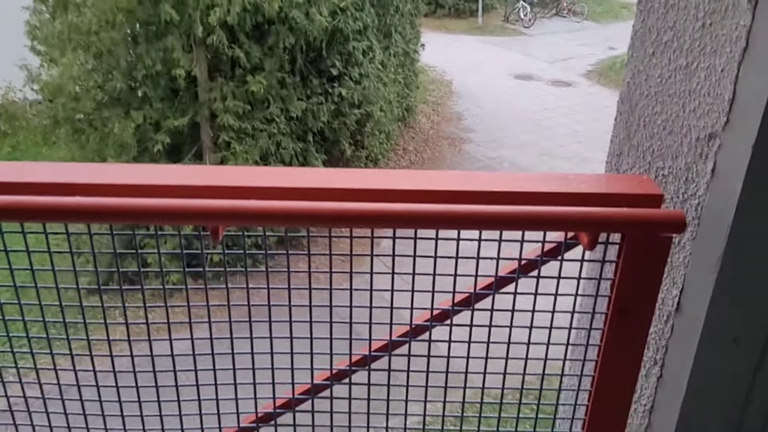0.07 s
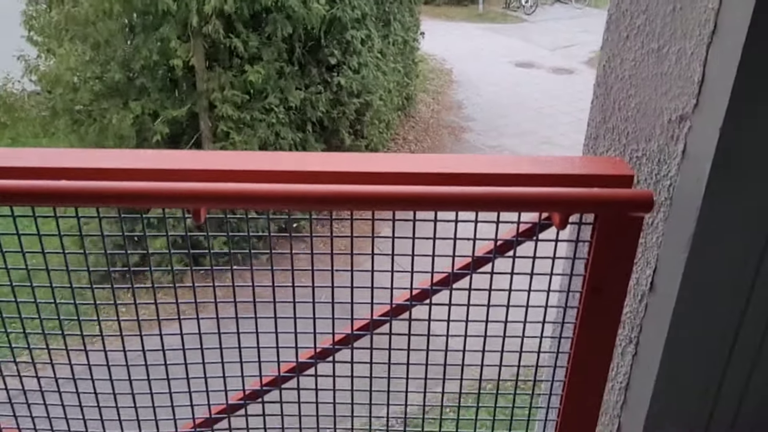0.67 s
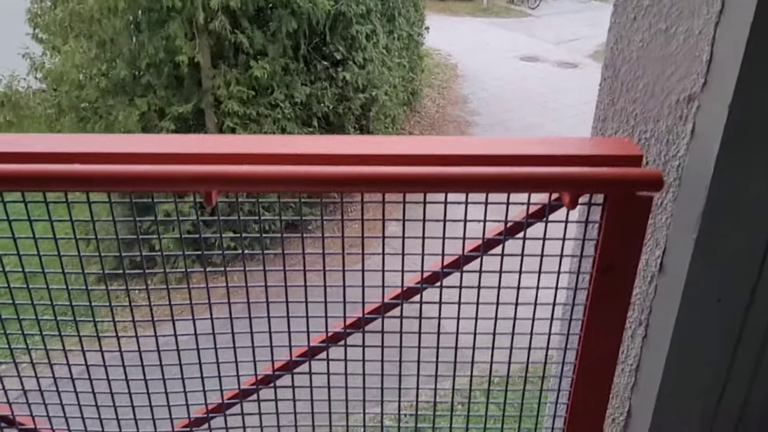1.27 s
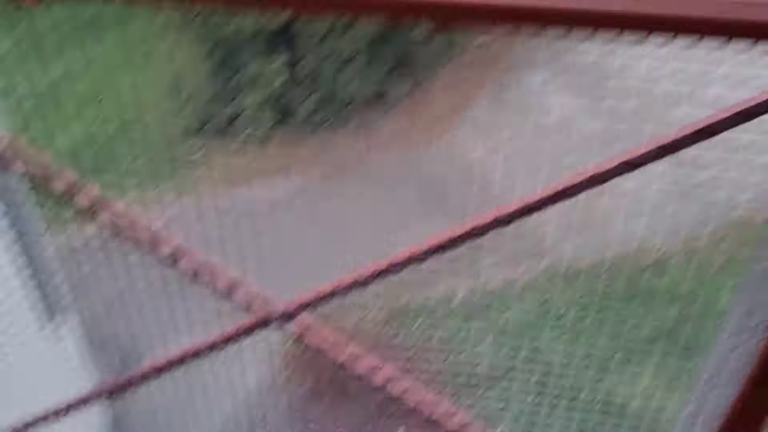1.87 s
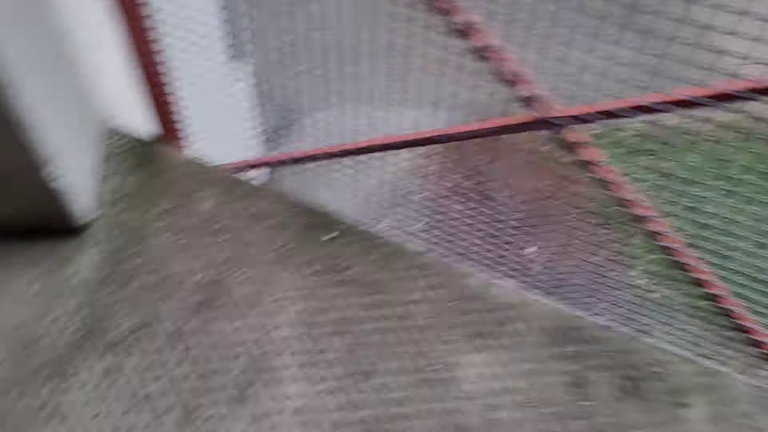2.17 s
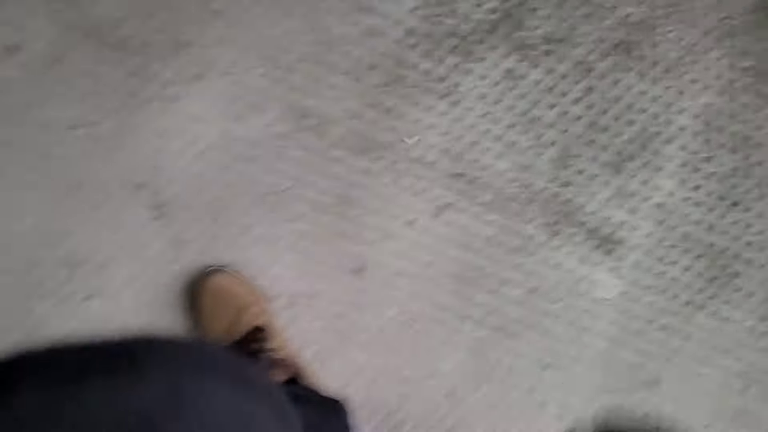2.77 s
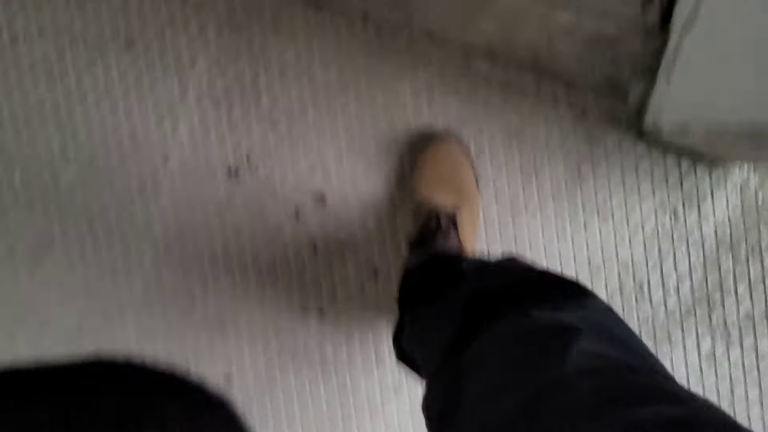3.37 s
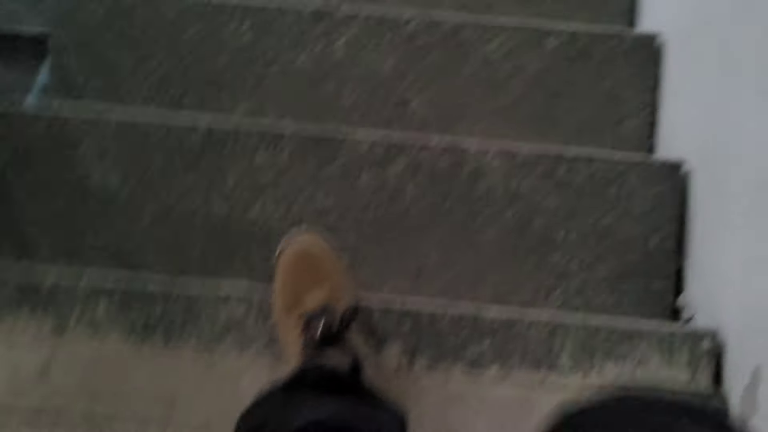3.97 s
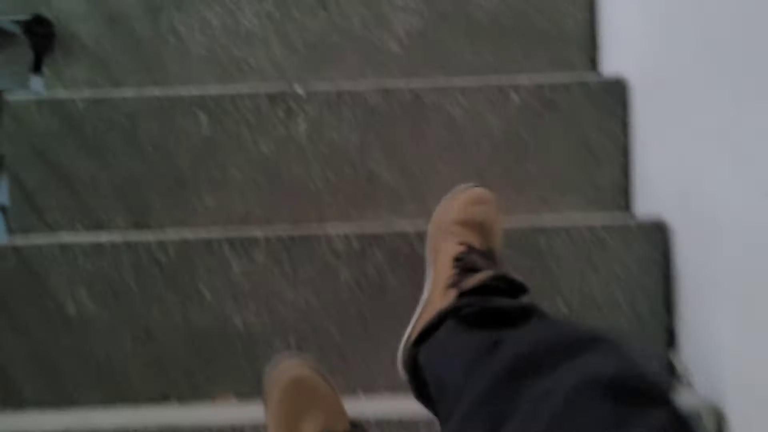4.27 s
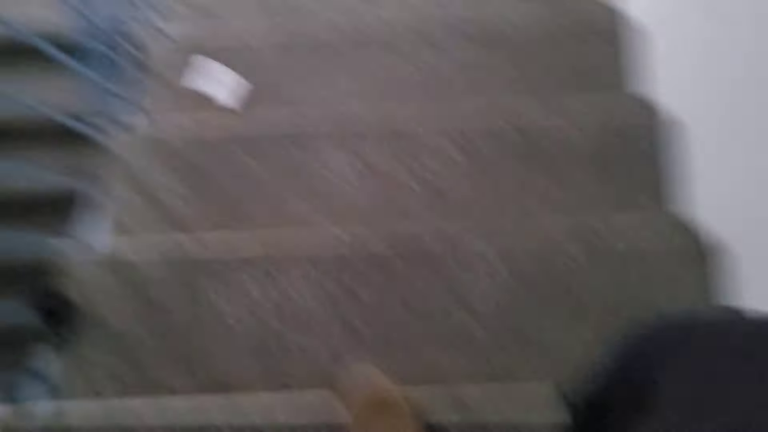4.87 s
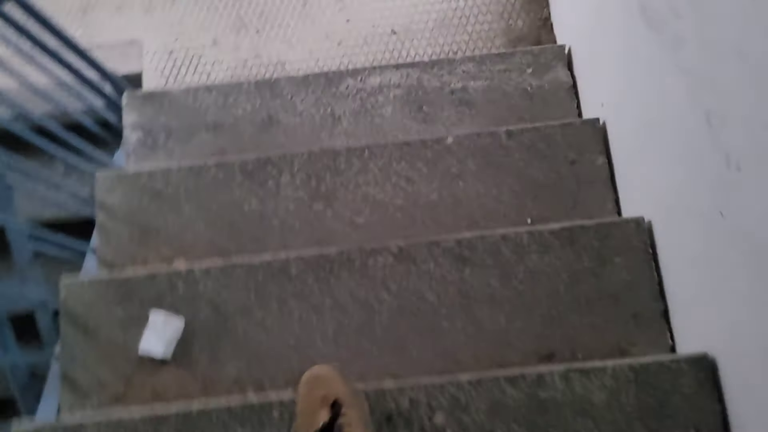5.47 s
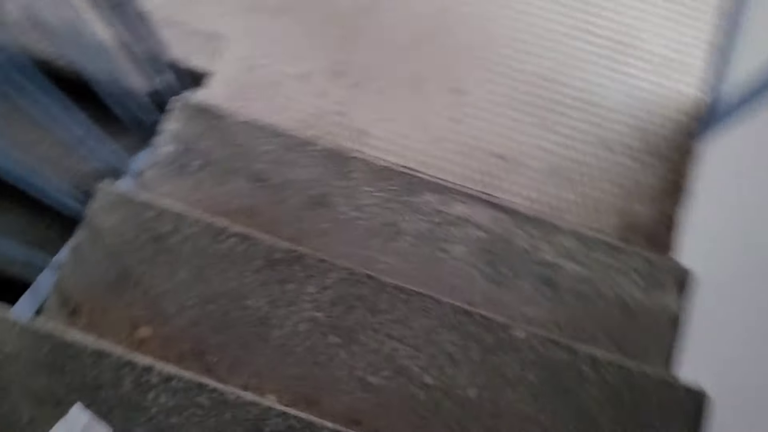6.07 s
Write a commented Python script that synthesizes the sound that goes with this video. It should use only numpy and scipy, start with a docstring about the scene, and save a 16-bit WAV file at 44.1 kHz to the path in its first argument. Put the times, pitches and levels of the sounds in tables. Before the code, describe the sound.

Someone in boots walks across a concrete landing and down an echoing stairwell, heard from a microphone in their hand. First come small handling clicks and sleeve swishes, mostly on the left, against a quiet outdoor background. Soles then scuff, grit ticks and a few light steps follow. Finally, brisk, deep footfalls descend the stairs in a steady rhythm, each ringing briefly off the bare walls while clothing keeps rustling.

```python
"""Boots turn on a concrete landing, cross it and walk down a flight of stairs.
Each impact thumps, excites the modes of the stair slab and booms in the reverberant stairwell.
Friction makes the soles judder and scrape on grit, and the clothes swish close to the microphone.
Fingers knock the hand-held camera and air buffets it, over a faint hush from outdoors."""
import sys
import numpy as np
from scipy import signal
from scipy.fft import rfft, irfft, next_fast_len
from scipy.io import wavfile

SR = 44100
rng = np.random.default_rng(int(sys.argv[2]) if len(sys.argv) > 2 else 0)


def master(y):
    """Save y as 16-bit WAV."""
    cut = np.clip(np.atleast_2d(y).T, -1, 1)
    pcm = np.round(cut * 32767)  # scale
    wavfile.write(sys.argv[1], SR, pcm.astype(np.int16))


N = 273464
TIME = np.arange(N) / SR


def amp(db):
    return 10 ** (np.asarray(db) / 20)


def read(points, hz):
    """Interpolation of a spectrum on a log-frequency axis."""
    f, value = np.transpose(points)
    return np.interp(np.log(hz + 1), np.log(f + 1), value)


def follow(rows, column=1):
    """Linear interpolation of a curve at every sample."""
    rows = np.asarray(rows)
    return np.interp(TIME, rows[:, 0], rows[:, column])


def fade(t, t60):
    """Exponential decay: 60 dB in t60 seconds."""
    return np.exp(-np.log(1000) * t / t60)


def ring(t, hz, t60):
    """Free vibration of one damped mode."""
    return np.sin(2 * np.pi * hz * t) * fade(t, t60)


def panned(db):
    """Constant-power panning: the left is db louder than the right."""
    gains = amp(np.array([db, -db]).reshape(2, -1) / 2)
    return gains / np.sqrt((gains ** 2).mean(0))


def add(mix, start_s, sound):
    """Superposition of a sound on the mix."""
    part = mix[:, max(round(start_s * SR), 0):][:, :sound.shape[-1]]
    part += sound[..., :part.shape[1]]


def together(levels):
    """Incoherent sources add in power."""
    return np.sqrt(sum(level ** 2 for level in levels))


def stroke(peak_s, db, rise_s, fall_s, rounding=0.011):
    """The envelope of one movement swells, rounds off and dies away."""
    t = TIME - peak_s
    away = np.minimum(np.where(t < 0, -t / rise_s, t / fall_s), 20)
    return amp(db) / np.cosh(away) * np.exp(-rounding * away ** 2)


def flutter(per_s, depth):
    """Random amplitude modulation of unit rms; depth scales a swing of about 2.3 dB each way."""
    swing_db = np.interp(TIME * per_s, np.arange(N), rng.uniform(-2.4, 2.2, N))
    gain = amp(depth * swing_db)
    return gain / np.sqrt(np.mean(gain ** 2) + 1e-20)


# likeness of the two microphone ports: frequency_hz, correlation (clipped to 1)
PORT_CORRELATION = [(30, 4), (70, 0.34), (150, 1), (300, 0.83), (600, 0.52), (1100, -0.12), (3000, 0),
                    (16000, 0)]
# their imbalance: frequency_hz, pan_db
PORT_BALANCE = [(200, 0.5), (600, 1), (1200, -0.5), (2200, -4), (4200, -0.5), (6000, -7.5), (8000, 1),
                (12000, 2.5), (16000, -0.5)]

def noise(spectrum, size=N):
    """Partly coherent noise: the ports agree in the bass, not the treble; their mean has rms 1."""
    length = next_fast_len(size)
    hz = np.fft.rfftfreq(length, 1 / SR)
    left, independent = rfft(rng.standard_normal((2, length)))
    same = np.clip(read(PORT_CORRELATION, hz), -1, 1)
    right = same * left + np.sqrt(1 - same ** 2) * independent
    shaped = np.array([left, right]) * amp(read(spectrum, hz)) * panned(read(PORT_BALANCE, hz))
    x = irfft(shaped, length)[:, :size]
    return x / x.mean(0).std()


# spectrum of the outdoor hush: frequency_hz, density_db
HUSH_SPECTRUM = [(30, -15), (90, -10.5), (165, -1.5), (220, -3), (285, 0.5), (420, -11), (520, -10.5),
                 (590, -8), (690, -11.5), (870, -12), (1300, -19.5), (2500, -35), (7000, -36.5),
                 (16000, -53)]

def outdoors(hush_db=-45.5, hum_db=-60, hum_hz=588.2, skirt_hz=24):
    """Broadband noise makes a steady hush; narrowband noise wavers as a distant hum."""
    band = [(hum_hz / 2, -100), (hum_hz - skirt_hz, -25), (hum_hz, 0),
            (hum_hz + skirt_hz, -25), (2 * hum_hz, -100)]
    return noise(HUSH_SPECTRUM) * amp(hush_db) + noise(band) * amp(hum_db)


# spectrum of a deep rumble: frequency_hz, density_db
RUMBLE_SPECTRUM = [(20, -40), (34, 1), (42, 1), (55, -15), (76, -7), (110, -28), (300, -70)]

def rumble(start_s=5.15, rise_s=0.12, level_db=-42, pan_db=-4):
    """Low-frequency noise swells late in the descent and then holds."""
    swell = np.clip((TIME - start_s) / rise_s, 0, 1)
    return noise(RUMBLE_SPECTRUM) * swell * amp(level_db) * panned(pan_db)


# how briskly the walker moves: time_s, effort_db
WALKING_EFFORT = [(0, -44), (.45, -10), (.85, -18), (1.0, -5), (1.7, -5.5), (1.95, 1.5), (3.15, -1.5),
                  (3.45, 7), (4.22, -2.5), (4.5, 4.5), (6.2, 4)]

def motion(level_db, exponent=1):
    """A power law ties a continuous sound to the walker's effort; level_db holds at 0 dB effort."""
    return amp(level_db + exponent * follow(WALKING_EFFORT))


# spectrum of air on the microphone: frequency_hz, density_db
WIND_SPECTRUM = [(15, 1.5), (25, -27), (36, -7.5), (60, -3), (100, -1.5), (200, -21), (600, -71)]
# puffs as the camera swings: peak_s, level_db
AIR_PUFFS = [(0.01, -50), (.22, -53), (.55, -58), (.73, -55), (1.59, -47), (1.97, -45), (2.63, -36.5),
             (2.81, -52), (3.12, -48.5), (3.56, -44), (3.81, -38.5), (4.22, -40.5), (5.28, -35),
             (6.09, -39)]

def buffeting(gain_db=6.5, pan_db=-7):
    """Turbulence at the moving microphone makes slow pressure fluctuations."""
    puffs = together(stroke(s, db, rise_s=0.021, fall_s=0.045) for s, db in AIR_PUFFS)
    strength = together([puffs, motion(-58.5, exponent=1.8)])
    return noise(WIND_SPECTRUM) * strength * amp(gain_db) * panned(pan_db)


# course of a thin squeak: time_s, pitch_hz, level_db
SQUEAK_GLIDE = [(5.795, 14400, -70), (5.805, 14400, -47), (5.82, 13700, -56), (5.84, 14700, -63),
                (5.86, 14800, -86), (5.88, 14400, -60), (5.90, 12800, -62), (5.915, 11300, -85)]

def squeak():
    """Frequency modulation of a faint, high tone gives a gliding whistle."""
    phase = 2 * np.pi * np.cumsum(follow(SQUEAK_GLIDE)) / SR
    tone = np.sin(phase) * amp(follow(SQUEAK_GLIDE, column=2))
    sounding = (TIME > SQUEAK_GLIDE[0][0]) & (TIME < SQUEAK_GLIDE[-1][0])
    return tone * sounding * flutter(per_s=320, depth=-1.0)


# spectra of smooth jacket fabric and of coarser cloth: frequency_hz, density_db
JACKET_SPECTRUM = [(300, -0.5), (1000, -11), (2500, -10), (4200, -5), (5600, 2), (7000, 4.5), (8400, -6),
                   (9600, -2.5), (11700, 5.5), (13500, 4), (16000, -4)]
CLOTH_SPECTRUM = [(300, 6), (1000, -4.5), (2500, 0), (4200, -0.5), (6000, 0.5), (7400, 2), (8700, -5.5),
                  (10000, -4), (12000, -2.5), (14000, -7), (16000, -4)]

def fabric(smooth, coarse):
    """Friction noise: fibres catch and slip in a grainy blend of two fabrics."""
    blend = smooth * noise(JACKET_SPECTRUM) + coarse * noise(CLOTH_SPECTRUM)
    return blend * flutter(per_s=63, depth=1.12)


def creases(per_s=30, loudest_db=-57, spread_db=10, t60=0.011, rustle_db=-72, pan_db=-30):
    """Buckling: small creases snap at random in the sleeve's faint rustle."""
    snaps, t = np.zeros((1, N)), np.arange(SR // 16) / SR
    for when, size in rng.random((int(per_s * N / SR), 2)):
        add(snaps, when * N / SR, amp(loudest_db - spread_db * size) * fade(t, t60))
    return noise(JACKET_SPECTRUM) * (snaps[0] + amp(rustle_db)) * panned(pan_db)


# spectrum of the dull rub of clothing: frequency_hz, density_db
RUB_SPECTRUM = [(40, -10), (100, -7.5), (160, -4.5), (290, -2.5), (450, -8), (700, -13.5), (1200, -34),
                (3000, -38)]
# strokes of the jacket sleeve: peak_s, level_db, rise_s, fall_s, pan_db, smooth_share
SLEEVE_STROKES = [(0.0, -50, .02, 0.015, -41, 0.4), (.22, -51.5, 0.079, 0.063, -35, 0.35),
                  (.5, -48.5, 0.0089, 0.025, -27, 0.1), (.587, -43, 0.024, 0.034, -22, 0.92),
                  (1.07, -53.5, .012, 0.031, -12, 0), (1.53, -39.5, 0.03, 0.043, -19, 0.5),
                  (1.78, -47.5, 0.083, 0.094, -17, 1), (2.08, -40.5, 0.14, 0.087, -6.5, 1),
                  (2.33, -52.5, 0.1, 0.35, -20, 0.9), (2.492, -40.5, 0.012, 0.071, -5, 0.93),
                  (2.575, -40, 0.062, 0.065, -20, 0.4), (2.85, -47.5, 0.05, 0.073, -23, 1),
                  (2.99, -49, 0.026, 0.048, -10, 1), (3.33, -50, 0.094, 0.15, -2, .7),
                  (3.555, -41, 0.04, 0.052, -15, 0.54), (3.66, -41.5, 0.043, 0.034, -15, 0.7),
                  (3.78, -41.5, 0.037, 0.034, -8, 0.4), (3.89, -45, 0.029, 0.12, -2, 0.24)]

def clothes(sleeve_gain_db=0.5, seam_gain_db=-8, legs_gain_db=3.1, legs_smooth_share=0.056):
    """Sliding friction: sleeve and trousers swish and seams rasp, above a dull rub."""
    arms = [(stroke(s, db, rise_s, fall_s) * panned(pan_db), share)
            for s, db, rise_s, fall_s, pan_db, share in SLEEVE_STROKES]
    swish, _ = strides()
    legs = together([swish, motion(-54)])
    moves = [(amp(sleeve_gain_db) * level, share) for level, share in arms]
    moves.append((amp(legs_gain_db) * legs, legs_smooth_share))
    smooth = together(level * np.sqrt(share) for level, share in moves)
    coarse = together(level * np.sqrt(1 - share) for level, share in moves)
    sleeve = together(level for level, _ in arms)
    seams = sleeve * amp(seam_gain_db) * noise(SCRAPE_SPECTRUM)
    rub = together([sleeve, motion(-47, exponent=0.7) * panned(-7)])
    return fabric(smooth, coarse) + seams + rub * noise(RUB_SPECTRUM) * flutter(per_s=60, depth=2.5)


# spectrum of a click on the case: frequency_hz, density_db
CLICK_SPECTRUM = [(200, 14.5), (700, 7), (2000, -1), (4000, -11), (7000, -4), (9000, -28), (12000, -1),
                  (16000, -13)]
# fingers on the camera: start_s, level_db, knock_t60_s, click_gain_db, wobble_gain_db, brush_gain_db
FINGER_KNOCKS = [(0.1117, -25.5, 0.055, -2.5, -22, -25), (0.19, -22, 0.022, -2, -19, -23),
                 (0.4885, -21, 0.037, -8, -19, -33), (2.9425, -26, 0.012, 1, -13.5, -36),
                 (2.9515, -19, 0.016, -6, -35, -41), (3.5082, -14.5, 0.015, -8, -24, -42),
                 (4.1159, -19.5, 0.025, -17.5, -7, -25), (4.189, -19, 0.015, -15, -14, -23),
                 (4.235, -25.5, 0.013, -18, -7, -16.5)]

def finger_knocks(knock_hz=260, wobble_hz=61, click_t60=0.0081, brush_s=0.0056, pan_db=-25):
    """Structure-borne sound: the case clicks, knocks and wobbles as cloth brushes the right port."""
    out, t = np.zeros((2, N)), np.arange(SR // 2) / SR
    wobble = ring(t, wobble_hz, t60=0.24) * panned(-7)
    brush_envelope = t / brush_s * np.exp(1 - t / brush_s)
    for s, db, t60, click_db, wobble_db, brush_db in FINGER_KNOCKS:
        click = amp(click_db) * fade(t, click_t60) * noise(CLICK_SPECTRUM, len(t))
        brush = amp(brush_db) * brush_envelope * noise(CLOTH_SPECTRUM, len(t))
        near = (ring(t, knock_hz, t60) + click + brush) * panned(pan_db)
        add(out, s, amp(db) * (near + amp(wobble_db) * wobble))
    return out


# slips of cloth and leather: start_s, level_db, centre_hz, half_width_octaves, t60_s, pan_db
SLIPS = [(.156, -31, 4000, 1.5, 0.0093, -26), (0.2517, -31.5, 4400, 7.9, 0.045, -34),
         (0.257, -33.5, 3260, 0.76, 0.053, -33), (.729, -47, 5000, 1.2, .027, -10),
         (2.305, -39, 2360, 0.46, 0.034, 3), (2.471, -36, 1990, 1.3, 0.062, -2),
         (3.365, -37, 1520, 0.14, 0.073, -1), (3.646, -36, 1950, 0.24, 0.19, -9),
         (3.764, -36.5, 2300, 0.19, 0.08, -11), (3.869, -39, 2150, 0.35, 0.19, -8),
         (3.957, -37, 1370, 0.4, 0.092, 6), (5.119, -36, 4500, .7, .2, -1),
         (5.136, -37.5, 3300, 0.86, 0.23, -3), (5.936, -22, 14500, 0.36, 0.018, 8),
         (5.946, -35, 13800, 0.35, 0.12, 2), (6.076, -42, 3400, 0.69, 0.51, -3)]

def rasps(rise_s=0.0021):
    """Static friction gives way: each slip is a burst of noise in its own band."""
    out, t = np.zeros((2, N)), np.arange(SR // 4) / SR
    grid_hz = np.geomspace(50, 20000, 200)
    for s, db, hz, octaves, t60, pan_db in SLIPS:
        band_db = -20 * np.log10(1 + (np.log2(grid_hz / hz) / octaves) ** 2)
        burst = noise(np.c_[grid_hz, band_db], len(t)) * fade(t, t60) * (1 - np.exp(-t / rise_s))
        add(out, s, amp(db) * burst * flutter(per_s=360, depth=0.5)[:len(t)] * panned(pan_db))
    return out


# reverberation time of the stairwell: frequency_hz, t60_s
STAIRWELL_T60 = [(60, 0.84), (170, 0.86), (330, 1), (700, 0.34), (2000, 0.2), (8000, 0.34)]

def absorb(x):
    """Absorption: between the concrete walls each band decays at its own rate."""
    hz, t, bands = signal.stft(x, SR, nperseg=512)
    decayed = bands * fade(t, read(STAIRWELL_T60, hz)[:, None])
    return signal.istft(decayed, SR, nperseg=512)[1][:, :x.shape[1]]


def stairwell(x, delay_s=0.006):
    """Reverberation: convolution with the dense reflections from bare walls."""
    tail = absorb(rng.standard_normal((2, SR)) * (np.arange(SR) > delay_s * SR))
    return signal.fftconvolve(x, tail / np.linalg.norm(tail[0]), axes=1)[:, :N]


# ticks of grit and lace ends: start_s, level_db, pitch_hz, t60_s, fizz_gain_db, pan_db
SMALL_IMPACTS = [(2.1196, -14, 1230, 0.0042, -29, -7), (2.161, -28, 1100, 0.0039, -1, -8),
                 (2.3039, -17, 2060, 0.0025, -38, -21), (3.365, -24, 13000, 0.0026, 1, 2),
                 (3.6136, -16.5, 750, 0.0087, -32, 3), (3.8585, -24, 696, 0.017, -14, 2),
                 (3.873, -28, 2000, 0.01, -2, -14), (3.9138, -21, 613, 0.02, -38, 2),
                 (4.472, -26, 1240, 0.012, -21, -6), (4.7545, -20, 670, 0.0097, -20, 7),
                 (4.857, -27, 1280, 0.017, -25, 7), (5.151, -17.5, 700, 0.0047, -11, 3),
                 (5.68, -29, 636, 0.023, -17, 8), (5.973, -27.5, 576, .02, -24, 6)]

def ticks():
    """Small, hard impacts each excite a heavily damped mode and a fizz of noise."""
    out, t = np.zeros((2, N)), np.arange(SR // 16) / SR
    for s, db, hz, t60, fizz_db, pan_db in SMALL_IMPACTS:
        fizz = amp(fizz_db) * noise(CLOTH_SPECTRUM, len(t)) * fade(t, t60)
        add(out, s, amp(db) * (fizz - ring(t, hz, t60)) * panned(pan_db))
    return out


# spectrum of rough scraping: frequency_hz, density_db
SCRAPE_SPECTRUM = [(200, -12), (500, -1.5), (900, 2), (1400, 1), (2100, 1.5), (3000, -3.5), (4200, -3),
                   (7000, -16), (9000, -21), (16000, -52)]
# scuffs on the landing: peak_s, level_db, rise_s, fall_s
LANDING_SCUFFS = [(1.97, -47, 0.032, 0.078), (2.14, -44.5, 0.062, 0.028), (2.55, -41.5, 0.046, 0.12),
                  (2.85, -42.5, 0.027, 0.021), (3.29, -48, 0.033, 0.072), (3.63, -42.5, 0.049, 0.066),
                  (3.77, -44.5, 0.018, 0.049), (3.88, -43, 0.023, 0.075)]

def sole_scrapes(grains_per_s=70, grain_gain_db=11, grain_t60=0.0085):
    """Roughness noise: rubber drags over concrete, and single grains of grit crack under it."""
    drag = noise(SCRAPE_SPECTRUM) * flutter(per_s=60, depth=1.5)
    t = np.arange(1024) / SR
    for when, pitch, left, right in rng.random((int(grains_per_s * N / SR), 4)):
        crack = ring(t, hz=550 * 6.5 ** pitch, t60=grain_t60)
        add(drag, when * N / SR, amp(grain_gain_db) * np.outer([left, right], crack))
    landing = together(stroke(*row) for row in LANDING_SCUFFS)
    _, flight = strides()
    return drag * together([landing * panned(-3), flight * panned(3), motion(-53) * panned(-3)])


# hollow tones of a sole on the landing: pitch_hz, level_db
JUDDER_TONES = [(319, 0.5), (350, -4.5), (556, -8), (574, -7.5), (657, -14)]

def sole_judder(start_s=2.469, gain_db=-27.5, rise_s=0.0029, hold_s=0.042, t60=0.48, pan_db=1):
    """Stick-slip vibration of a turning sole: close pairs of tones beat against each other."""
    t = np.maximum(TIME - start_s, 0)
    tones = sum((-1) ** k * amp(db) * np.sin(2 * np.pi * hz * t)
                for k, (hz, db) in enumerate(JUDDER_TONES))
    level = amp(gain_db) * (1 - np.exp(-t / rise_s)) * fade(np.maximum(t - hold_s, 0), t60)
    return tones * level * flutter(per_s=82, depth=-1.5) * panned(pan_db)


# steps down the flight, toe first: toe_s, toe_db, toe_hz, slab_gain_db, boom_cutoff_hz, toe_swish_db,
# heel_s, heel_db, heel_hz, heel_swish_db
STAIR_STEPS = [(4.392, -18.5, 133.5, -3, 310, -44, 4.502, -24, 143, -45.5),
               (4.754, -13, 179, -2, 490, -44.5, 4.856, -23, 294, -52),
               (5.161, -14.5, 190, 0.5, 326, -37.5, 5.289, -23.5, 187, -44.5),
               (5.583, -17.5, 127, -10, 403, -41, 5.679, -22.5, 341, -48.5),
               (6.0, -16.5, 134, -19, 535, -47, 6.114, -27, 150, -42)]

def strides(toe_lead_s=0.0017, heel_lead_s=0.018, toe_drag_gain_db=-9.5, heel_drag_db=-41.5):
    """Friction envelopes: trousers swish as the toe lands and the knee gives; the heel drags most."""
    swish, drag = [], []
    for toe_s, _, _, _, _, toe_swish_db, heel_s, _, _, heel_swish_db in STAIR_STEPS:
        toe = stroke(toe_s - toe_lead_s, toe_swish_db, rise_s=0.038, fall_s=0.039)
        heel = stroke(heel_s - heel_lead_s, 0, rise_s=0.056, fall_s=0.074)
        swish += [toe, heel * amp(heel_swish_db)]
        drag += [toe * amp(toe_drag_gain_db), heel * amp(heel_drag_db)]
    return together(swish), together(drag)


# modes of the stair slab: pitch_hz, level_db, t60_s
SLAB_MODES = [(108.3, -11.5, 0.4), (169.7, 1, 0.46), (221.6, -5.5, 0.29), (247.7, -17, 0.95),
              (327, -8.5, 0.46), (375, -19, 0.11), (569, -45, 0.36)]
# first reflections from treads and walls: delay_s, level_db
EARLY_REFLECTIONS = [(.0085, 2), (0.014, -35), (0.029, -19), (.039, -21)]

def boot_impact(hz, t60, slab_db, boom_db, cutoff_hz, boom_gain_db=1.5, slap_gain_db=-2,
                sole_rise_s=0.00062, slab_rise_s=0.0081, boom_rise_s=0.0017):
    """Impact excitation: a boot thumps and slaps, the slab rings, the stairwell echoes and booms."""
    t = np.arange(SR) / SR
    thump = ring(t, hz, t60) * (1 - np.exp(-t / sole_rise_s))
    slap = np.zeros((1, SR))
    for delay_s, db in [(0.0065, 0)] + EARLY_REFLECTIONS:
        add(slap, delay_s, amp(db + slap_gain_db) * ring(t, hz=330, t60=0.018))
    slab = sum(amp(db) * ring(t, mode_hz, mode_t60) for mode_hz, db, mode_t60 in SLAB_MODES)
    slab *= 1 - np.exp(-t / slab_rise_s)
    boom = stairwell_boom(t, cutoff_hz) * (1 - np.exp(-t / boom_rise_s))
    return amp(boom_db + boom_gain_db) * boom - thump - slap - amp(slab_db) * slab


# spectrum of the stairwell's boom: frequency_hz, density_db
BOOM_SPECTRUM = [(30, -14), (60, 12), (100, 3), (160, 3), (300, 10.5), (500, 4), (1000, 3), (3000, -8.5)]

def stairwell_boom(t, cutoff_hz, linger=0.34):
    """Double-slope decay: dense low reverberation falls quickly, then lingers in the shaft."""
    lowpass = signal.butter(3, cutoff_hz, fs=SR, output="sos")
    boom = signal.sosfilt(lowpass, noise(BOOM_SPECTRUM, len(t)))
    return absorb(boom) * (fade(t, 0.94) + linger)


# steps on the landing: start_s, level_db, thump_hz, boom_gain_db
LANDING_STEPS = [(2.479, -29, 254, -3.5), (2.548, -28.5, 242, -3), (2.815, -33.5, 216, -3),
                 (3.207, -29.5, 227, -16), (3.545, -36, 172, -18), (3.780, -32.5, 254, -5),
                 (3.858, -26.5, 146, -11.5), (3.872, -25.5, 256, -9), (3.954, -29, 284, -21)]

def footfalls(pan_db=-1.7):
    """Impacts superpose: single blows on the landing, then toe and heel on each stair."""
    out = np.zeros((2, N))
    for s, db, hz, boom_db in LANDING_STEPS:
        add(out, s, amp(db) * boot_impact(hz, t60=0.1, slab_db=-17.5, boom_db=boom_db, cutoff_hz=586))
    for toe_s, toe_db, toe_hz, slab_db, cutoff_hz, _, heel_s, heel_db, heel_hz, _ in STAIR_STEPS:
        toe_t60 = 0.18 * (134 / toe_hz) ** 2.2  # a low, flat-footed thump rings longer
        toe = boot_impact(toe_hz, toe_t60, slab_db, boom_db=-10, cutoff_hz=cutoff_hz)
        heel = boot_impact(heel_hz, t60=0.17, slab_db=slab_db - 3.5, boom_db=-3.5, cutoff_hz=440)
        add(out, toe_s, amp(toe_db) * toe)
        add(out, heel_s, amp(heel_db) * heel)
    return out * panned(pan_db)


def scene():
    """Sound pressures add: the boots, the sounds near the microphone and the background."""
    grit = ticks()
    boots = footfalls() + sole_judder() + sole_scrapes() + grit + amp(-6.5) * stairwell(grit)
    near = rasps() + finger_knocks() + clothes() + creases() + squeak()
    return boots + near + outdoors() + buffeting() + rumble()


def record(dry, low_hz=24, high_hz=16050):
    """Band limiting: the microphone loses the deepest bass and the highest treble."""
    x = signal.sosfilt(signal.butter(2, low_hz, "high", fs=SR, output="sos"), dry)
    lowpass = signal.firwin(511, high_hz, window=("kaiser", 9), fs=SR)
    return signal.oaconvolve(x, lowpass[None], "same")


dry = scene()
out = record(dry)
master(out)
```